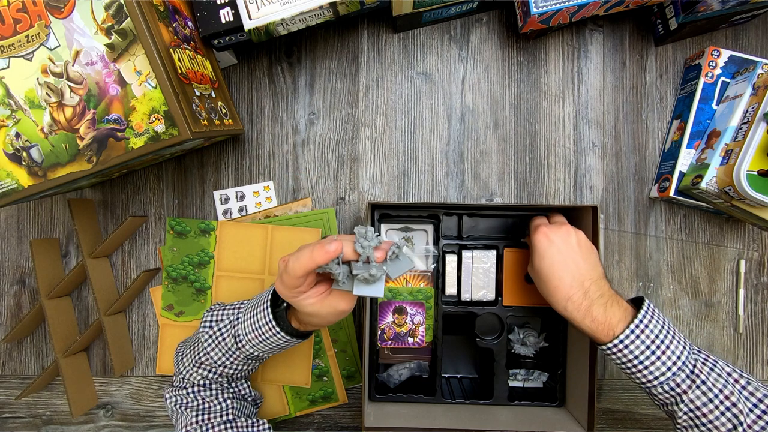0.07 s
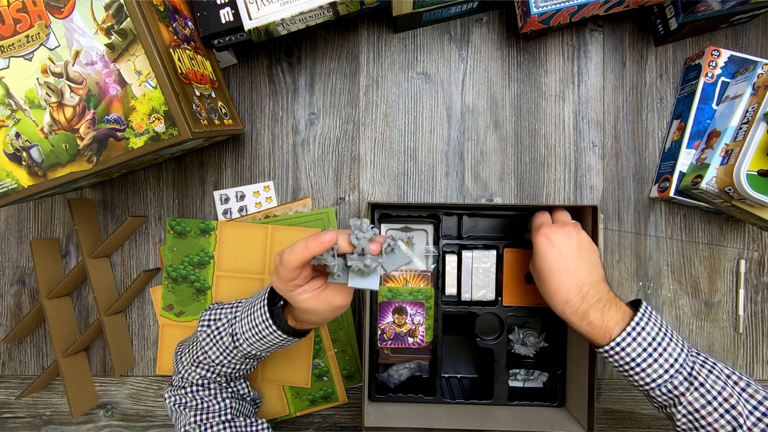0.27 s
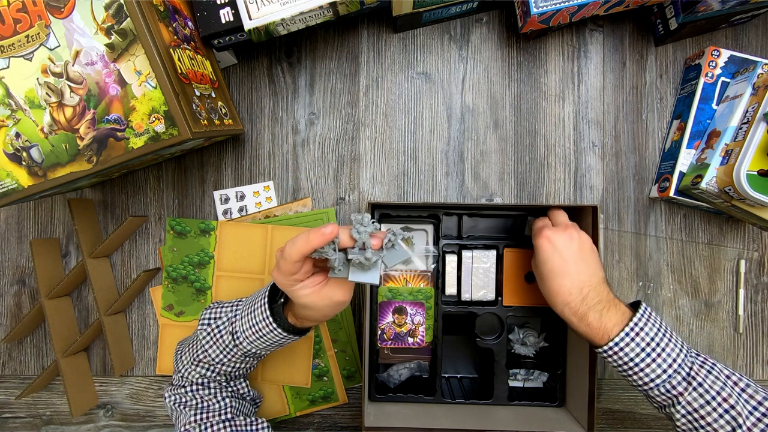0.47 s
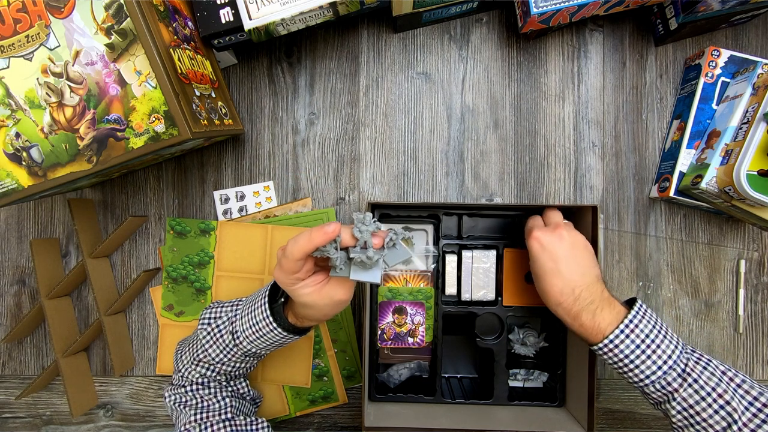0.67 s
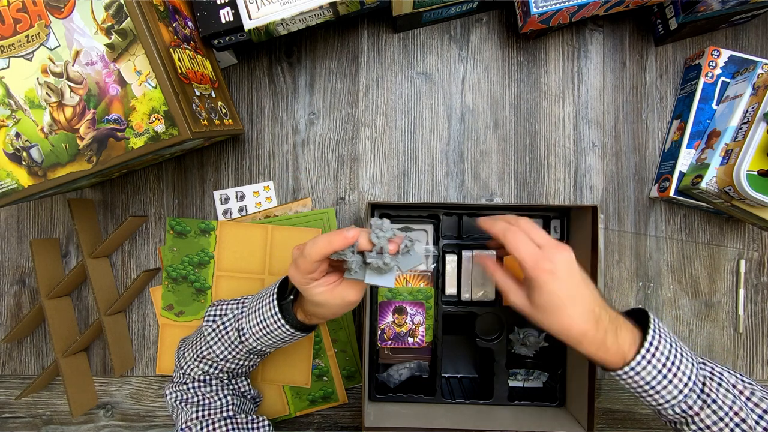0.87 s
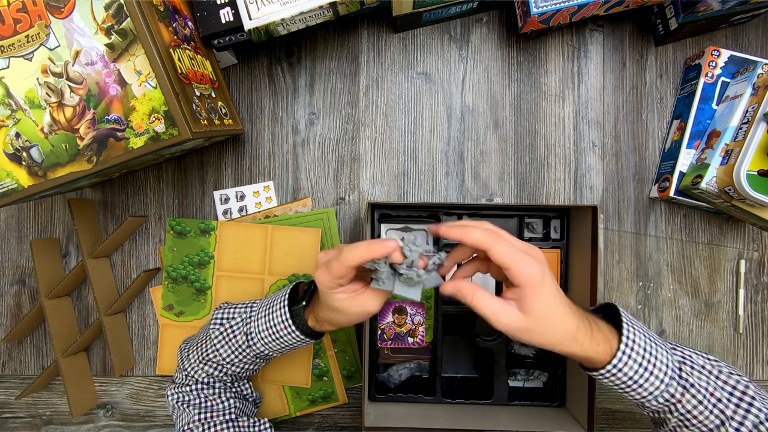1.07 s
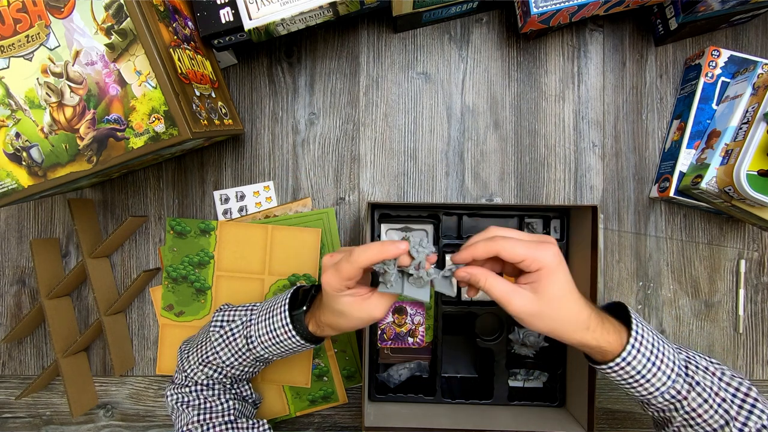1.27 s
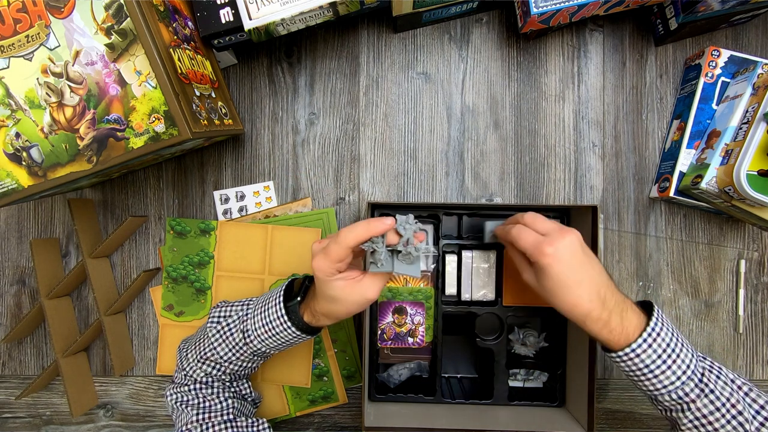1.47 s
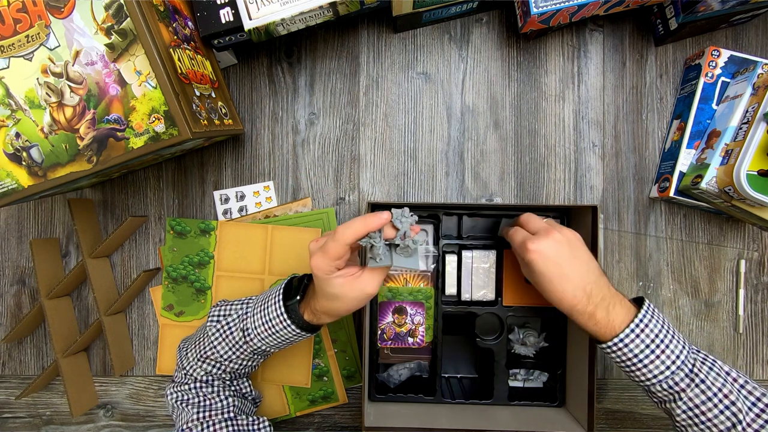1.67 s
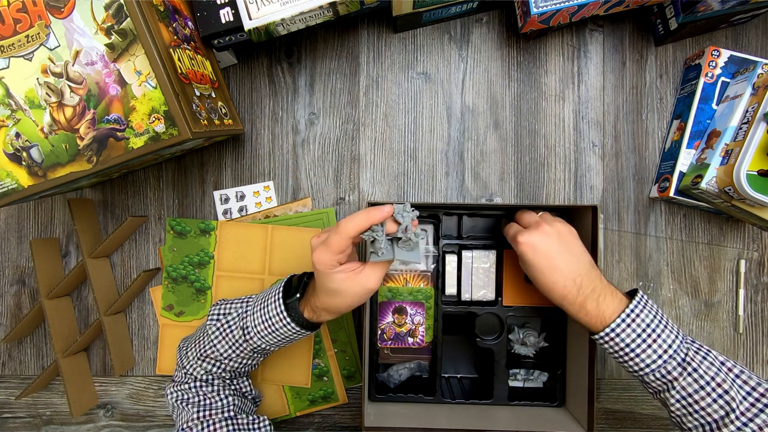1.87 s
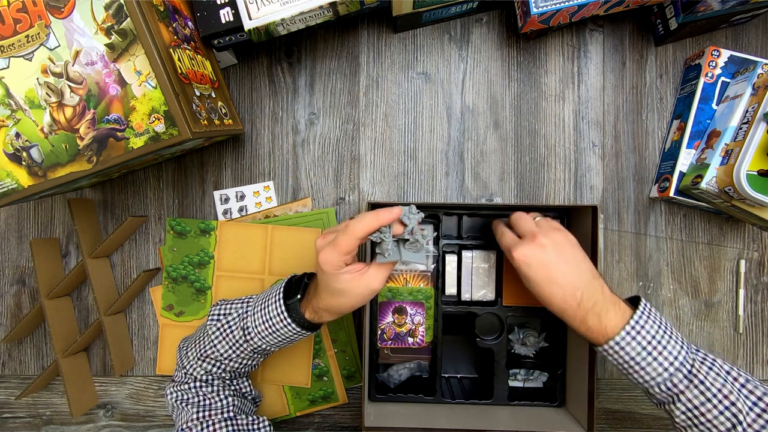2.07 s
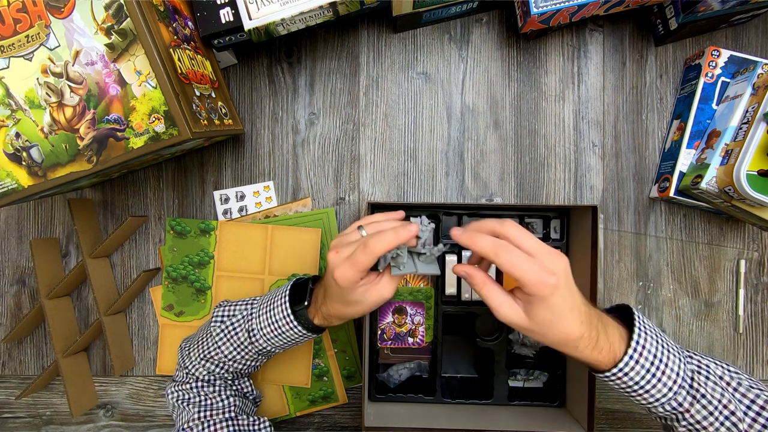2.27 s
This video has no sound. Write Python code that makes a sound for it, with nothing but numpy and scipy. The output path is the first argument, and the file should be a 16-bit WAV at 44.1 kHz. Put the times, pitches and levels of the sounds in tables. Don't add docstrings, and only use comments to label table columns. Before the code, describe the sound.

Plastic miniatures rattle into a thin moulded tray, with hollow knocks, sharp clicks and faint rubbing

```python
import sys
import numpy as np
from scipy import signal
from scipy.fft import rfft, irfft
from scipy.io import wavfile
from scipy.ndimage import uniform_filter1d

SR = 44100
rng = np.random.default_rng(int(sys.argv[2]) if len(sys.argv) > 2 else 0)


def natural_amplitude(level_db):
    exponent = np.asarray(level_db, float) / 20
    return 10 ** exponent


def dump(signal):
    limited = np.clip(np.atleast_2d(signal).T, -1, 1)
    pcm = np.round(limited * 32767).astype(np.int16)
    wavfile.write(sys.argv[1], SR, pcm)


N = 101430


def at_hz(points, hz):
    table_hz, value = np.transpose(points)
    return np.interp(np.log(np.maximum(hz, 1)), np.log(table_hz), value)


def colour(x, points):
    hz = np.fft.rfftfreq(len(x), 1 / SR)
    return irfft(rfft(x) * natural_amplitude(at_hz(points, hz)), len(x))


def rms_one(x):
    return x / np.sqrt(np.mean(x ** 2) + 1e-20)


def ring(clicks, hz, t60):
    r, w = natural_amplitude(-60 / (t60 * SR)), 2 * np.pi * hz / SR
    return signal.lfilter([0, np.sin(w)], [1, -2 * r * np.cos(w), r * r], clicks + 1e-18)


def band(x, low_hz, high_hz):
    edges = [max(low_hz, 20), min(high_hz, 0.45 * SR)]
    return signal.sosfilt(signal.butter(2, edges, "band", fs=SR, output="sos"), x)


def drift(rate):
    return np.interp(np.arange(N) / SR * rate, np.arange(200), rng.standard_normal(200))


def place(at, shapes):
    out = np.zeros(N)
    for i, shape in zip(at, shapes):
        out[i:i + len(shape)] += shape
    return out


# [f/Hz, level/dB per Hz]
ROOM_FLOOR = [(16, -11.5), (28, -2), (150, -11), (420, -20), (800, -28), (2000, -35.5), (8900, -42),
              (9900, -47.5), (15500, -47.5)]


def background():
    return natural_amplitude(-44.5) * rms_one(colour(rng.standard_normal(N), ROOM_FLOOR))


# [f/Hz, level/dB per Hz]
PREAMP_HISS = [(40, 4), (400, 0.5), (2000, -2.5), (8000, -3), (16000, -2.5)]


def preamp_hiss():
    return natural_amplitude(-67.5) * rms_one(colour(rng.standard_normal(N), PREAMP_HISS))


# [f/Hz, t60/s]
ROOM_T60 = [(150, 0.33), (400, 0.24), (1000, 0.32), (2800, 0.24), (7000, 0.27), (14000, 0.092)]
# [f/Hz, level/dB]
ROOM_GAIN = [(150, -10.5), (500, 0.9), (1500, -1), (5000, 2.5), (14000, -2.5)]


def room(x):
    onset_s, level_db = 0.003, 5 - 33
    t = np.arange(SR // 2) / SR
    edges = 90 * 2 ** np.arange(0, 8, 0.5)
    white = rng.standard_normal((2, len(t)))
    tail = 0
    for k, (low, high) in enumerate(zip(edges, edges[1:])):
        hz = np.sqrt(low * high)
        decay = natural_amplitude(at_hz(ROOM_GAIN, hz) - 60 * t / at_hz(ROOM_T60, hz))
        tail = tail + band(white[k % 2], low, high) * decay
    spectrum = rfft(tail)
    power = np.abs(spectrum) ** 2
    even = np.sqrt(uniform_filter1d(power, size=250) / uniform_filter1d(power, size=18))
    tail = irfft(spectrum * even, len(t))
    tail = tail * np.clip((0.42 - t) / 0.1, 0, 1) * np.clip(t / onset_s - 0.3, 0, 1)
    return natural_amplitude(level_db) * signal.fftconvolve(x, tail)[:N]


# [start t/s, length/s, level/dB]
MOTOR_RUNS = [(0.021, 0.015, -57), (0.038, 0.18, -63), (.25, .04, -64), (0.547, 0.17, -53.5),
              (0.85, .1, -67), (.96, .12, -71), (1.2, 0.12, -68), (1.47, .07, -70), (1.655, 0.09, -58),
              (1.75, 0.22, -59), (2.04, 0.1, -59.5), (2.157, 0.2, -55.5)]


def motor():
    whine_hz, width_hz, edge_s, fade_db = 12850, 130, 0.012, -13
    t, runs = np.arange(N) / SR, 0
    for start, length, db in MOTOR_RUNS:
        u = (t - start) / length
        gate = np.clip(np.minimum(u, 1 - u) * length / edge_s, 0, 1)
        runs = runs + natural_amplitude(db + fade_db * np.clip(u, 0, 1)) * gate
    whine = band(rng.standard_normal(N), whine_hz - width_hz / 2, whine_hz + width_hz / 2)
    return runs * natural_amplitude(2.7 * drift(60.0)) * rms_one(whine)


# [centre t/s, width/s, level/dB, f/Hz, bandwidth/Hz]
SLEEVE = [
    (1.172, 0.016, -58.5, 8100, 1300),
    (0.93, .01, -60, 7800, 2600),
    (1.35, 0.13, -57, 1440, 2230),
    (2.22, 0.053, -60.5, 9200, 660),
    (0.043, 0.041, -63, 8400, 2300),
    (2.1, 0.043, -60.5, 6600, 1700),
    (1.69, 0.028, -55, 6400, 5600),
    (2.0, 0.019, -54.5, 8100, 11000),
    (0.14, 0.04, -53.5, 6300, 3300),
    (2.104, 0.13, -57, 2000, 3700),
]


def rustle():
    t, white = np.arange(N) / SR, rng.standard_normal(N)
    out = 0
    for centre, width, db, hz, bw_hz in SLEEVE:
        puff = np.exp(-0.5 * ((t - centre) / width) ** 2)
        out = out + natural_amplitude(db) * puff * rms_one(band(white, hz - bw_hz / 2, hz + bw_hz / 2))
    return out


# [start t/s, length/s, level/dB, squeak f/Hz]
SLIDES = [
    (.0, 0.034, -51.5, 1260),
    (0.1, 0.071, -45.5, 1502),
    (.195, 0.02, -52, 1300),
    (0.412, 0.2, -45, 716),
    (0.615, 0.065, -38.5, 640),
    (1.655, 0.069, -52, 1150),
    (1.671, 0.083, -52.5, 2090),
    (1.966, 0.069, -44, 1130),
    (0.22, 0.081, -42.5, 1400),
    (1.603, 0.046, -53.5, 550),
]


def slides():
    clicks_per_s, squeak_db, squeak_t60 = 1500, -6.5, 0.026
    t = np.arange(N) / SR
    sizes = natural_amplitude(3.37 * np.minimum(rng.exponential(1, N), 4)) * rng.choice([-1, 1], N)
    clicks = sizes * (rng.random(N) < clicks_per_s / SR)
    rub, squeak = 0, 0
    for start, length, db, squeak_hz in SLIDES:
        stroke = np.sin(np.pi * np.clip((t - start) / length, 0, 1) ** 0.7)
        one_rub = natural_amplitude(db) * stroke * clicks
        rub = rub + one_rub
        squeak = squeak + natural_amplitude(squeak_db) * ring(one_rub, squeak_hz, squeak_t60)
    return rub, squeak


# [t/s, level/dB, f/Hz]
TICK_TONES = [(0.217, -36, 6300), (0.250, -33, 6700), (0.250, -40, 13500), (.217, -43, 12500),
              (.349, -46, 14000), (.603, -39, 12800), (.603, -14, 395), (0.67, -17, 1210),
              (.563, -19.5, 650), (.229, -22, 1110), (.272, -22, 1170), (.218, -22, 1500),
              (1.867, -19, 810), (1.867, -18, 1490), (1.884, -22, 660), (1.907, -28, 450),
              (1.907, -25, 780), (1.842, -23, 285), (1.868, -25, 4260), (1.996, -26, 1150),
              (.649, -23.5, 1300), (.349, -32.5, 7600), (.476, -32.5, 3960), (0.42, -47, 13000),
              (.531, -24.5, 4500), (.531, -22, 2340), (.532, -49, 17000), (0.565, -33, 11600),
              (1.761, -44, 14000), (1.841, -46, 9400), (1.866, -34, 13000), (1.867, -45, 14200),
              (1.867, -23, 2950), (1.761, -20.5, 300), (1.768, -24, 394), (1.600, -31, 650),
              (1.61, -30.5, 510), (0.561, -13.5, 380), (.564, -14, 800), (.605, -17, 630),
              (.668, -31, 2850), (.637, -36, 4600), (1.5, -46, 2900), (1.603, -36, 1400), (1.882, -18, 390),
              (.219, -21, 275), (0.438, -28.5, 440), (0.112, -26, 405)]


def tick_tones():
    t = np.arange(3000) / SR
    start, db, hz = np.transpose(TICK_TONES)[:, :, None]
    wobble = np.cumsum(rng.standard_normal((len(TICK_TONES), len(t))), axis=1) * hz * 2.5e-5
    t60 = 0.01 + 8.9 / hz
    tick = np.sin(2 * np.pi * hz * t + wobble) * natural_amplitude(db + 0.44 - 60 * t / t60)
    return place((start[:, 0] * SR).astype(int), tick)


# [t/s, peak level/dB, tray boom/dB rel, crack/dB rel, rattle t60/s]
FIRST_FIGURE = [(0.021, -38.5, -2, -0.5, .03), (0.071, -44, 2.5, -8, .05), (0.111, -30.5, 2, -13, 0.065),
                (0.117, -40, 13.5, -7, .04), (0.154, -44, -19, 3, .03), (0.2165, -17, -6, -11.5, 0.032),
                (0.221, -16, -7, -18, .04), (.232, -21, -7, -15, 0.069), (0.25, -20.5, -4.5, -6, 0.034),
                (0.266, -19, -27, -22, .05), (.273, -20.5, -18, -25, .06), (.286, -26, -17, -20, 0.044),
                (.309, -30, -13, -18, 0.035), (0.348, -20.5, -13, -7, 0.033), (0.353, -22.5, 0, -22, .04),
                (0.428, -24, -1, -11, .04), (0.4735, -22.5, -6, -8.5, 0.049), (0.482, -26, 1.5, -12, 0.037),
                (0.506, -34, 9, -5, .03), (0.530, -18.5, -6, -6.5, 0.049), (.546, -23, 2, -10, 0.037),
                (0.562, -12, 2.5, -18, .025), (0.566, -11, 3, -16, .025), (0.578, -17, 4, -18, .04),
                (.595, -18.5, 3, -22, .03), (0.602, -10, 1, -13, .02), (0.607, -13, 2, -22, .025),
                (.621, -20.5, -2, -20, 0.048), (0.637, -23, 5.5, -14, 0.048), (0.648, -21, -5, -28, .04),
                (0.667, -24, 2, -14, .04), (.681, -25.5, 3, -20, 0.038)]
# [t/s, peak level/dB, tray boom/dB rel, crack/dB rel, rattle t60/s]
SECOND_FIGURE = [(1.5995, -33.5, 3, -6, 0.041), (1.608, -40.5, 5, -7, .04), (1.659, -33.5, -3, -14, 0.064),
                 (1.692, -44, -15, -14, .04), (1.759, -19.5, -3.5, -8, .05),
                 (1.772, -22.5, -3.5, -14, 0.036), (1.8395, -20.5, -3, -8, 0.047),
                 (1.846, -21.5, -1, -9, 0.046), (1.866, -9, -9, -8, 0.038), (1.872, -15.5, -3.5, -8, 0.045),
                 (1.883, -15, 1.5, -12, 0.016), (1.897, -27, -16, -8, .04), (1.906, -17, -5, -18, .03),
                 (1.921, -26.5, -6, -20, 0.045), (1.979, -32.5, -8, -3, .05), (1.994, -24.5, -10, -14, .09),
                 (2.04, -41, -7, -6, .03)]


def contacts():
    start, db, boom_db, crack_db, rattle_t60 = np.transpose(FIRST_FIGURE + SECOND_FIGURE)
    t = np.arange(3000) / SR
    push = rng.standard_normal((len(start), len(t))) ** 3 * natural_amplitude(-60 * t / rattle_t60[:, None])
    push[:, 0] = 5.5
    push = push / np.sqrt(np.sum(push ** 2, axis=1, keepdims=True))
    return (start * SR).astype(int), db, boom_db, crack_db, push


def cracks(at, db, crack_db, push):
    t = np.arange(push.shape[1]) / SR
    fade = natural_amplitude(-60 * t / 0.015) + natural_amplitude(-11.0 - 60 * t / 0.055)
    crack = band(rng.standard_normal(push.shape) * fade, 2040, 9740) * natural_amplitude(-3 + db + crack_db)[:, None]
    crack = signal.lfilter([0.6], [1, -0.4], crack)
    crunch = band(push, 350, 2620) * natural_amplitude(1.5 + db)[:, None]
    return place(at, crack + crunch)


# [f/Hz, level/dB, t60/s]
HOLLOW = [(220, -17, 0.088), (297, -10.5, 0.042), (327, -5.5, 0.034), (411, 0.5, 0.066), (459, -2.5, 0.12),
          (538, -3, 0.034), (633, -2.5, 0.081)]
# [f/Hz, level/dB, t60/s]
WALLS = [(740, -5.5, 0.033), (844, -0.5, 0.022), (960, -3.5, 0.013), (1128, -3.5, 0.024),
         (1215, -5.5, 0.012), (1400, 4, 0.013), (1532, -6.5, 0.018), (1723, -4.5, 0.021),
         (1910, -15, 0.0083), (2080, -10.5, 0.012), (2464, -6, 0.006), (2913, -9, 0.0082),
         (3640, -27.5, 0.021), (4240, -18, 0.0082)]


def tray_modes(at, db, boom_db, push, rub):
    spread_db, longest_ring_s = 1, 0.035
    t = np.arange(push.shape[1]) / SR
    modes = [(mode, -8.5 + boom_db) for mode in HOLLOW] + [(mode, -10.5) for mode in WALLS]
    out = np.zeros(N)
    for (hz, level_db, t60), part_db in modes:
        even = (np.abs(push @ np.exp(2j * np.pi * hz * t)) + 0.3) ** -0.7
        chance_db = spread_db * rng.standard_normal(len(at))
        strength = even * natural_amplitude(db + part_db + level_db + chance_db)
        drive = rub * natural_amplitude(level_db - 13.0) + place(at, strength[:, None] * push)
        out = out + ring(drive, hz, min(t60, longest_ring_s))
    return out


def figures():
    at, db, boom_db, crack_db, push = contacts()
    rub, squeak = slides()
    tray = squeak + tray_modes(at, db, boom_db, push, rub) + cracks(at, db, crack_db, push)
    tray = tray + natural_amplitude(-36) * band(rub, 1400, 6000)
    low_cut = signal.butter(4, 239, "high", fs=SR, output="sos")
    return signal.sosfilt(low_cut, [tray, tick_tones()])


def scene():
    tray, ticks = figures()
    to_room = tray + natural_amplitude(-6.5) * ticks
    mid = background() + room(to_room) + motor() + rustle() + tray + ticks
    side = preamp_hiss()
    return np.array([mid + side, mid - side])


def low_pass(x):
    return signal.sosfilt(signal.butter(12, 16450, fs=SR, output="sos"), x)


def record(dry):
    top = signal.cheby2(10, 40, 16200, fs=SR, output="sos")
    mix = signal.sosfilt(top, dry)
    return low_pass(mix)


dry = scene()
out = record(dry)
dump(out)
```